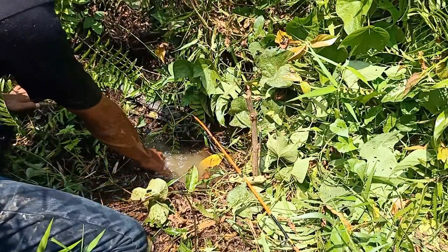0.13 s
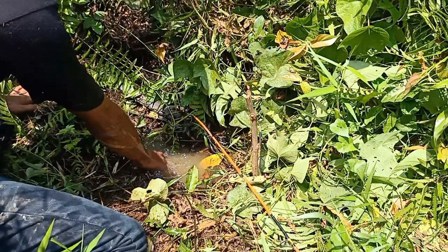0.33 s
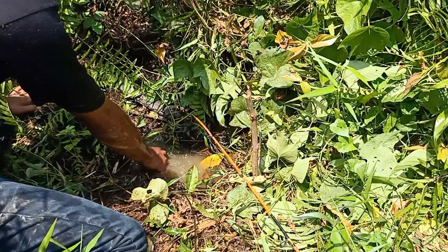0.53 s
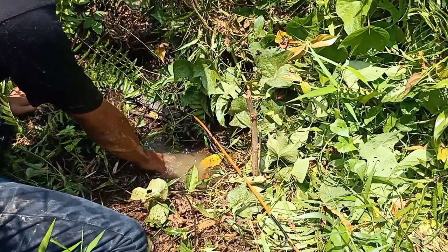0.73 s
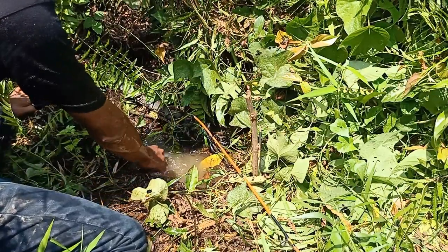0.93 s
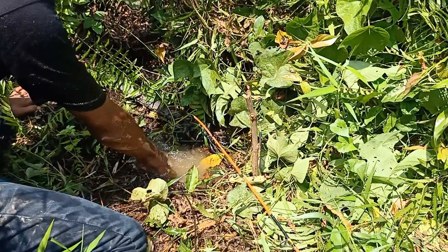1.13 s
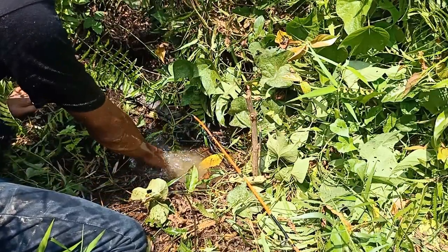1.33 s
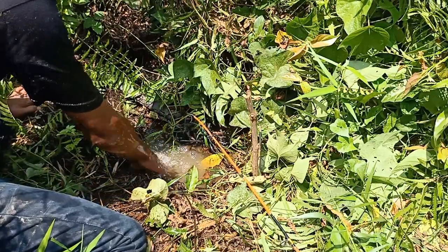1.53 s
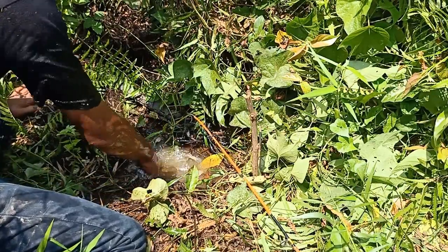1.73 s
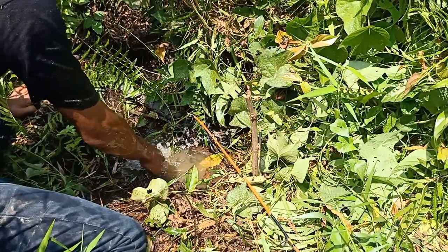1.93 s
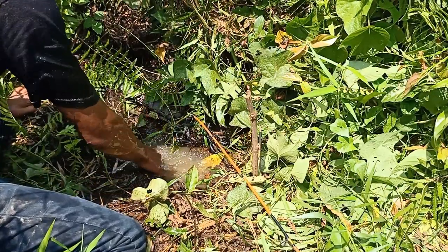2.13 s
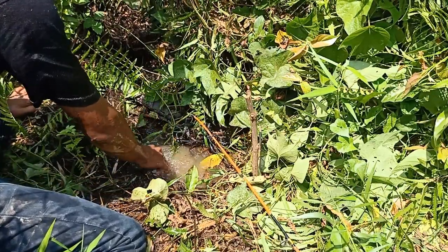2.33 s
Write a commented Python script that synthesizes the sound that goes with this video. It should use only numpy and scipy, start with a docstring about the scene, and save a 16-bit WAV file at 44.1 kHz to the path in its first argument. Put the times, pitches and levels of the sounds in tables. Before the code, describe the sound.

Hand splashing in a small muddy water hole, close and dry outdoors. A sharp wet slap at 0.2 seconds, a second, hollower one at 0.6, and a fuller double-edged splash with gulping bubbles at 1.1. After a near-quiet gap, uneven sloshing, plops and spray run from about 1.55 to 2.2, then die away. Faint hiss throughout; low wind thumps, strongest on the left around 1.7 to 1.8.

```python
"""Hand slapping and sloshing a swamp hole

A hand slaps the muddy water in a small swamp hole three times, then scoops and sloshes it about.
Slaps are noise cracks with wavering tones of trapped air pockets; gulps and drops are damped sines.
Churning is a swarm of tiny bubbles with foam noise and crackle; leaves and banks scatter the water sound.
Air buffets two close microphone ports as low wavering thumps; a faint outdoor hiss is shaped noise."""
import sys
import numpy as np
from scipy import signal
from scipy.fft import rfft, irfft
from scipy.io import wavfile
from scipy.ndimage import uniform_filter1d

SR = 44100
rng = np.random.default_rng(int(sys.argv[2]) if len(sys.argv) > 2 else 0)


def waveform_to_disk(signal):
    """Save audio, clipped to [-1, 1], as 16-bit WAV at the path in sys.argv[1]."""
    frames = np.transpose(np.atleast_2d(signal))
    scaled = np.clip(frames, -1, 1) * 32767
    samples = np.round(scaled).astype(np.int16)
    wavfile.write(sys.argv[1], SR, samples)


N = 105840
T = np.arange(N) / SR

# Spectrum of fine spray, for slaps and crackle: frequency_hz, density_db (per Hz, relative)
SPRAY_SPECTRUM = [(200, -16), (900, -11), (2000, 0), (3600, 6), (4500, -2.5), (5600, 0), (6800, 4.5),
                  (7700, -6), (8800, -21.5), (15500, -25.5)]
PORT_LAG_S = 0.0001


def from_db(db):
    """Amplitude gain is the exponential of a level in decibels."""
    return 10 ** (np.asarray(db) / 20)


def rms_one(x):
    """Normalization: divide by the root mean square."""
    return x / np.sqrt(np.mean(x ** 2) + 1e-20)


def at_hz(points, hz):
    """A spectrum in dB, interpolated along logarithmic frequency."""
    f, db = np.transpose(points)
    return np.interp(np.log(np.maximum(hz, 1)), np.log(f), db)


def noise(spectrum):
    """Spectral shaping: white noise weighted in the frequency domain, at unit rms."""
    hz = np.arange(N // 2 + 1) * SR / N
    white = rng.standard_normal(N)
    return rms_one(irfft(rfft(white) * from_db(at_hz(spectrum, hz)), N))


def drift(hz, size=N):
    """Low-passed noise: a random fluctuation of unit spread, slower than the cutoff."""
    lowpass = signal.butter(2, hz, fs=SR, output="sos")
    settled = rms_one(signal.sosfilt(lowpass, rng.standard_normal(size + SR)))
    return settled[SR:]


def waver(hz, wander_oct, wander_hz):
    """Frequency modulation: phase integrates a pitch that strays at random around a curve."""
    pitch = hz * 2 ** (wander_oct * drift(wander_hz, size=len(hz)))
    return np.sin(2 * np.pi * (rng.random() + np.cumsum(pitch) / SR))


def burst(carrier, envelope):
    """Amplitude modulation, scaled so that the burst has the energy of its envelope."""
    x = carrier[:len(envelope)] * envelope
    return x * np.sqrt(np.sum(envelope ** 2) / (np.sum(x ** 2) + 1e-20))


def add(out, s, x):
    """Superposition: add a sound into the mix at a given time."""
    i = int(np.clip(s * SR, 0, N - 1))
    out[i:i + len(x)] += x[:N - i]


def evened(x):
    """Gain control: hold a swarm at unit level over 40 ms, keeping its grain."""
    power = np.abs(uniform_filter1d(x * x, size=SR // 25))
    return x / np.sqrt(power + 1e-12)


def air_hiss():
    """Incoherent background: independent broadband noise at each port."""
    # Outdoor hiss: frequency_hz, density_db (per Hz, relative)
    hiss_spectrum = [(30, -11), (80, 1), (200, -4.5), (400, -1), (1000, -4), (1700, -4), (2400, -1),
                     (3300, -5), (5000, -7), (6800, -1.5), (8000, -7), (9200, -25), (15500, -28.5)]
    return from_db(-52.5) * np.array([noise(hiss_spectrum), noise(hiss_spectrum)])


def wind():
    """Turbulence: low pressure thumps, mostly stronger at one port, over a restless rumble."""
    # Rumble of moving air: frequency_hz, density_db (per Hz, relative)
    rumble_spectrum = [(20, -22), (45, -9), (75, 0), (130, -3.5), (200, -11), (300, -34), (600, -52)]
    # Gusts on the ports: centre_s, level_db, width_s (Gaussian spread), pitch_hz, left_over_right_db
    gusts = [(0.0, -43, 0.017, 65, 16), (0.059, -42, 0.012, 100.6, 2), (0.203, -37.5, 0.0092, 80, 36),
             (0.431, -38, 0.0039, 101.4, -30.5), (0.768, -43.5, 0.011, 90, -28.5),
             (0.885, -41.5, 0.022, 92.6, -32), (0.948, -34.5, 0.011, 122, -36),
             (0.982, -31, 0.004, 168, -34), (1.59, -45, 0.02, 88, 9), (1.667, -37, 0.02, 95, 27),
             (1.699, -21.5, 0.0057, 100, 34), (1.73, -31.5, 0.016, 106, 12), (1.787, -23, 0.0034, 145, 30),
             (1.808, -20, 0.0024, 125, 30), (1.841, -33.5, 0.027, 99, 28), (1.955, -45, 0.027, 70.5, 18),
             (2.292, -40.5, 0.0098, 97, -18)]
    rumble_db, swing_db, swing_hz = -55, 3, 12.0
    wander_oct, wander_hz = 0.3, 108
    out = np.array([from_db(rumble_db + swing_db * drift(swing_hz)) * noise(rumble_spectrum)
                    for _ in range(2)])
    for s, db, width, hz, pan_db in gusts:
        sides = from_db([[pan_db / 2], [-pan_db / 2]])
        balance = 2 * sides / sides.sum()
        eddy = waver(np.full(N, hz), wander_oct, wander_hz)
        swell = np.exp(-.5 * ((T - s) / width) ** 2)
        out += balance * from_db(db) * burst(eddy, swell)
    return out


def scatter(x, db, t60, hz, kind):
    """Diffuse reflection: convolution with exponentially decaying noise, different at each port."""
    t = T[:SR // 2]
    colour = signal.butter(1, hz, kind, fs=SR, output="sos")
    echo = signal.sosfilt(colour, rng.standard_normal((2, len(t))))
    echo *= np.exp(-np.log(1000) * t / t60)
    echo /= np.sqrt(np.sum(echo ** 2, axis=1, keepdims=True))
    return from_db(db) * signal.fftconvolve(x[None], echo, axes=1)[:, :N]


def surroundings(x):
    """Frequency-dependent scattering: banks return a dull tail, near leaves a short bright one."""
    banks = scatter(x, db=-23.5, t60=0.12, hz=3520, kind="low")
    leaves = scatter(x, db=-7, t60=0.021, hz=3000, kind="high")
    return banks + leaves


def at_ports(x, lag_s):
    """Propagation delay: the water reaches the right port just before the left."""
    hz = np.arange(N // 2 + 1) * SR / N
    left = irfft(rfft(x) * np.exp(-2j * np.pi * hz * lag_s), N)
    return np.array([left, x])


def bubble(hz, t60):
    """Bubble resonance: a damped sine whose pitch climbs as the bubble nears the surface."""
    rise_per_s = 3.2  # as a fraction of the starting pitch
    attack_s = 1.64 / hz  # 1.64 cycles
    t = T[:int(t60 * SR) + 2]
    tone = np.sin(2 * np.pi * hz * (t + rise_per_s * t * t / 2))
    decay = np.exp(-np.log(1000) * np.maximum(t - attack_s, 0) / t60)
    return tone * np.minimum(t / attack_s, 1) * decay


def drop_swarm(spectrum):
    """Superposed resonators: small bubbles at random times, their mean energy following a spectrum."""
    drops_per_s, drop_cycles, spread_db = 1050, 13, 4.5
    out = np.zeros(N)
    # The number of drops varies at random about its mean
    count = rng.binomial(12000, drops_per_s * N / SR / 12000)
    for when, pitch, size, sign in rng.random((count, 4)):
        hz = 300 * 30 ** pitch  # 300 to 9000 Hz, even in octaves
        size_db = spread_db * min(-np.log(1 - size), 3.5) + at_hz(spectrum, hz)
        # Factor hz offsets the shorter ring and sparser spacing of high pitches
        gain = np.sign(sign - .5) * hz * from_db(size_db)
        add(out, when * N / SR, gain * bubble(hz, drop_cycles / hz))
    return evened(out)


def droplet_crackle():
    """Shot noise: random clicks, each decaying exponentially, gate the spray noise."""
    clicks_per_s, decay_s = 1000, .0005
    clicks = (rng.random(N) < clicks_per_s / SR) * rng.standard_normal(N)
    grains = signal.lfilter([1], [1, -np.exp(-1 / (decay_s * SR))], clicks + 1e-18)
    return rms_one(noise(SPRAY_SPECTRUM) * grains)


def slosh():
    """Agitated two-phase flow: bubbles, foam and droplets share the strength of the churning."""
    # Churned water: frequency_hz, density_db (per Hz, relative)
    slosh_spectrum = [(120, -28), (330, -2), (480, -9), (750, -2), (1150, -2), (2200, 1), (3100, -8.5),
                      (3900, -10), (4700, -15.5), (6700, -14), (7800, -23), (9000, -31), (15500, -40)]
    # Strength of churning, one curve per movement: time_s, level_db
    churn_curves = [
        [(0.18, -62), (0.225, -32.5), (0.26, -47.5), (0.29, -60), (0.37, -56), (0.42, -70)],
        [(0.57, -59), (0.632, -49.5), (0.665, -39), (0.71, -70)],
        [(1.088, -53), (1.11, -29), (1.135, -32.5), (1.175, -46), (1.188, -38), (1.225, -42), (1.26, -51.5),
         (1.34, -59)],
        [(1.46, -71), (1.49, -52), (1.545, -62), (1.57, -32.5), (1.59, -37.5), (1.615, -38.5), (1.66, -40.5),
         (1.68, -34), (1.70, -47.5), (1.733, -44), (1.755, -29.5), (1.79, -38), (1.82, -33.5), (1.843, -32.5),
         (1.915, -43), (1.935, -31), (1.955, -37.5), (1.97, -35), (1.99, -42.5), (2.01, -30.5), (2.025, -36.5),
         (2.06, -48.5), (2.083, -29), (2.11, -35.5), (2.135, -39.5), (2.155, -30.5), (2.175, -44.5),
         (2.24, -55), (2.28, -56.5), (2.37, -62.5)],
    ]
    level = sum(from_db(np.interp(T, *np.transpose(curve), left=-120, right=-120))
                for curve in churn_curves)
    drops = from_db(1) * drop_swarm(slosh_spectrum)
    foam = from_db(-1) * noise(slosh_spectrum)
    crackle = from_db(-22.5) * droplet_crackle()
    return level * (drops + foam + crackle)


def skimmed(x):
    """Bubble size sets pitch: fingers skimming the surface make no large, low bubbles."""
    start_s, end_s, cut_hz = 1.3, 1.66, 450
    shallow = uniform_filter1d(((T > start_s) & (T < end_s)).astype(float), size=SR // 50)
    highpass = signal.butter(6, cut_hz, "high", fs=SR, output="sos")
    return x * (1 - shallow) + shallow * signal.sosfilt(highpass, x)


def plops():
    """Free bubble oscillation: larger bubbles and gulps that stand out alone."""
    # Single bubbles and gulps: start_s, pitch_hz, peak_db, t60_s
    bubbles = [(0.129, 1620, -40, 0.059), (0.204, 1330, -29.5, 0.03), (0.2125, 2280, -15.5, 0.01),
               (0.222, 1110, -19.5, 0.071), (0.222, 346, -22.5, 0.024), (0.237, 264, -41.5, 0.15),
               (0.294, 603, -42, 0.075), (0.581, 532, -40.5, 0.1), (0.603, 1160, -21.5, 0.021),
               (0.621, 1097, -34.5, .04), (0.639, 294, -19.5, 0.068), (0.644, 516, -13.5, 0.018),
               (0.671, 1660, -27, 0.016), (0.828, 823, -44.5, 0.068), (1.099, 752.6, -17.5, 0.02),
               (1.125, 806, -8.5, 0.025), (1.129, 520, -14.5, 0.031), (1.141, 347, -25, 0.038),
               (1.16, 266, -19.5, 0.02), (1.161, 1650, -23.5, 0.014), (1.19, 1780, -22.5, 0.025),
               (1.205, 1970, -25, 0.018), (1.221, 1660, -21.5, 0.0093), (1.222, 467, -31, 0.062),
               (1.572, 722, -26, 0.052), (1.595, 840, -23, 0.015), (1.603, 1340, -19, 0.032),
               (1.645, 2070, -23, 0.027), (1.742, 744, -23, 0.014), (1.797, 1316, -23, 0.027),
               (1.856, 1120, -15.5, 0.02), (1.875, 1470, -22.5, 0.015), (1.994, 1580, -17, 0.013),
               (2.108, 378, -33.5, 0.051), (2.158, 642, -35, 0.045), (2.210, 1260, -30, 0.029),
               (2.271, 1270, -37, 0.031)]
    out = np.zeros(N)
    for s, hz, db, t60 in bubbles:
        add(out, s, from_db(db) * bubble(hz, t60))
    return out


def slap_envelope(t, rise_s, hold_s):
    """Two-stage decay: a quick rise, a hold, then a fast fall that gives way to a slower tail."""
    t60_s, tail_db, tail_t60_s = 0.016, -5, 0.038
    after = np.maximum(t - rise_s - hold_s, 0) * np.log(1000)
    fall = np.exp(-after / t60_s)
    tail = from_db(tail_db) * np.exp(-after / tail_t60_s)
    return np.minimum(t / rise_s, 1) ** 2 * np.maximum(fall, tail)


def slaps():
    """Cavity resonance: squeezed air pockets glide down as they open, up as they close; spray cracks."""
    # Water struck by the hand: time_s (middle of the rise), level_db, hold_s, main_pocket_hz,
    # second_pocket_hz, second_db, hollow_hz, hollow_db, spray_db (these three relative to the main
    # pocket), glide_oct (each way from the middle pitch, negative falls)
    contacts = [(0.2139, -10.5, 0.0044, 1287, 1722, 2, 649, -7.5, -3.5, -0.16),
                (0.348, -41, 0.0046, 1526, 2420, -2, 604, -24, -2.5, 0),
                (0.598, -22, 0.0033, 1161, 2140, -10, 564, -10.5, -13, -0.039),
                (0.6351, -12.5, 0.0043, 1123, 2186, -3, 622, -9, -4.5, 0.27),
                (0.648, -13, 0.0019, 1190, 1940, -25, 567, -23, -12.5, 0.044),
                (1.0875, -22, 0.00062, 1970, 1350, -2, 890, -11, -1.5, -0.27),
                (1.092, -14, 0.0028, 1595, 2100, -0.5, 658, -4, -6, -0.071),
                (1.1169, -12.5, 0.0018, 2243, 1420, -3.5, 790, -20.5, -8, -0.37),
                (1.1205, -9, 0.0028, 1019, 1906, -1.5, 615, -7.5, -10.5, -0.43),
                (1.533, -25, 0.0026, 1270, 1487, -14, 835, -50, -26, 0.062),
                (1.7695, -15.5, 0.0015, 2388, 1488, -0.5, 800, -19, -20, -.1),
                (1.842, -22, 0.0037, 1005, 1510, -11, 590, -13, -10, -0.15),
                (1.93, -29, 0.0037, 683, 1156, -9, 490, -12, -5.5, 0.059),
                (2.0668, -29, 0.0058, 1160, 1380, -0.5, 713, -14, -4.5, -0.034),
                (2.1197, -23.5, 0.0019, 1080, 1708, -4.5, 626, -15, -8, 0.021),
                (2.364, -49.5, 0.013, 2680, 1750, -22, 710, -31, 6.5, -0.043)]
    rise_s, glide_s = 0.001842, 0.006
    wander_oct, wander_hz = .23, 708
    out, t = np.zeros(N), T[:SR // 6]
    for s, db, hold, main_hz, second_hz, second_db, hollow_hz, hollow_db, spray_db, glide in contacts:
        envelope = slap_envelope(t, rise_s, hold)
        bend = 2 ** (glide * np.tanh((t - rise_s - hold / 2) / glide_s))
        hit = from_db(spray_db) * burst(noise(SPRAY_SPECTRUM), envelope)
        for hz, part_db in ((main_hz, 0), (second_hz, second_db), (hollow_hz, hollow_db)):
            pocket = waver(hz * bend, wander_oct, wander_hz)
            hit += from_db(part_db) * burst(pocket, envelope)
        add(out, s - rise_s / 2, from_db(db) * hit)
    return out


def scene():
    """Superposition of direct and scattered sound: slaps in the middle, churning on both sides."""
    water = at_ports(slaps() + plops(), PORT_LAG_S)
    # The two sides of the hole lie in different directions
    for side_lag_s in (-.00003, .00003):
        water = water + at_ports(skimmed(slosh()), PORT_LAG_S + side_lag_s) / np.sqrt(2)
    return water + surroundings(water[1]) + wind() + air_hiss()


def record(dry):
    """Band limiting and overload: the deepest bass is cut, peaks are clipped, the top is cut."""
    low_cut_hz, cutoff_hz = 23, 15600
    highpass = signal.butter(3, low_cut_hz, "high", fs=SR, output="sos")
    lowpass = signal.ellip(10, .1, 70, cutoff_hz, fs=SR, output="sos")
    clipped = np.clip(signal.sosfilt(highpass, dry), -.95, .95)
    return signal.sosfilt(lowpass, clipped)


dry = scene()
out = record(dry)
waveform_to_disk(out)
```